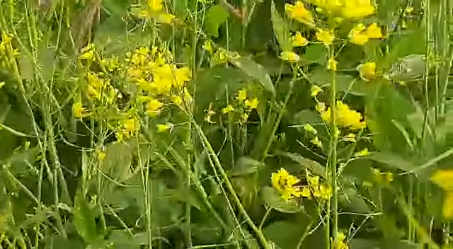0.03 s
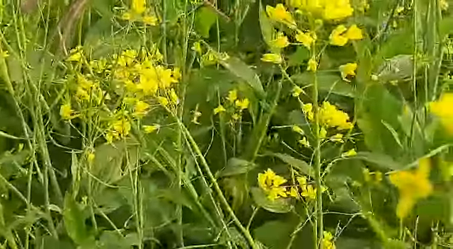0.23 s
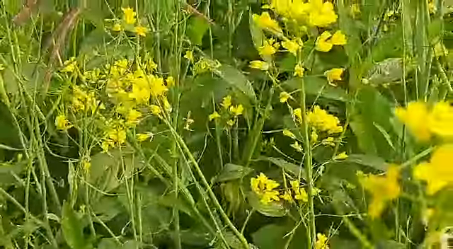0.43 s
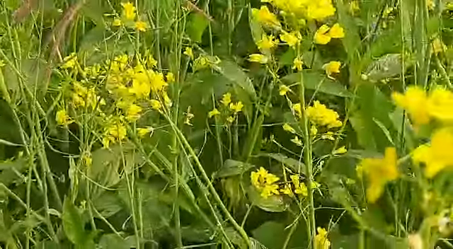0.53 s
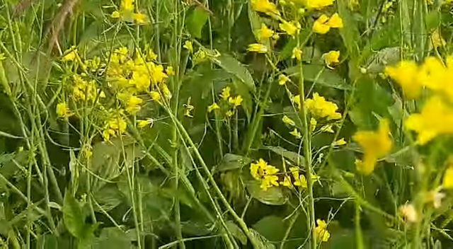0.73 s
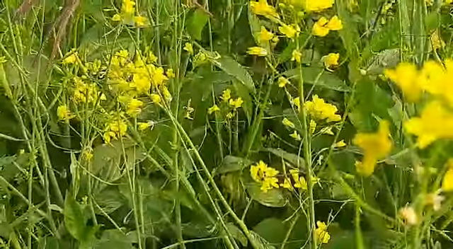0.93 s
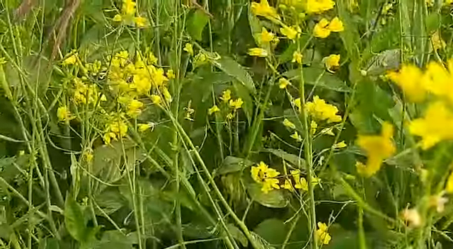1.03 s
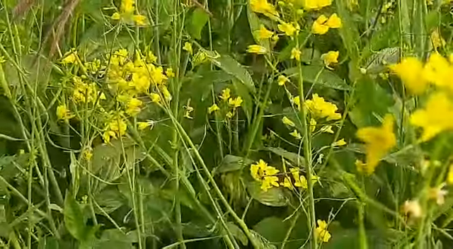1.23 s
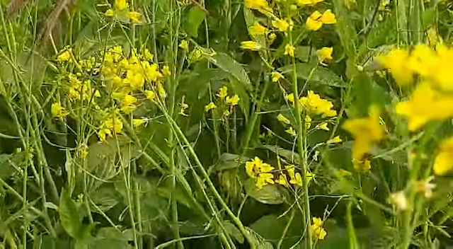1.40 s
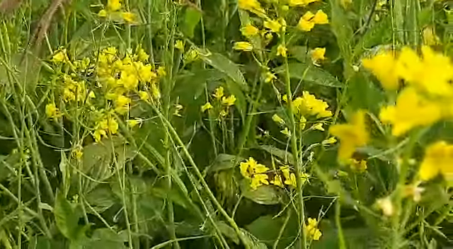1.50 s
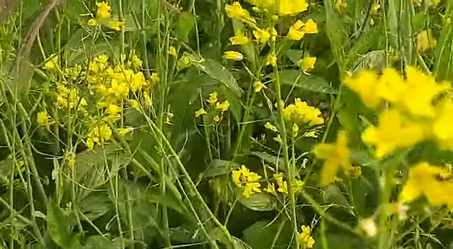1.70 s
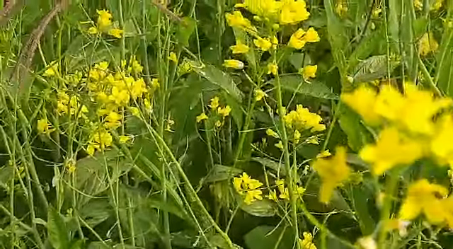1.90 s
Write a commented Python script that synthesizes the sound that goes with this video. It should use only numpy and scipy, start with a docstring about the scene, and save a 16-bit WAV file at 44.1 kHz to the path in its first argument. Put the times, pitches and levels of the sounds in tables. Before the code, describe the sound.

One short, bright call from a nearby small bird stands out over low wind rumble, light leaf rustle and a thin steady hiss in an open field. Afterwards come faint chips and hoarse calls from distant birds.

```python
"""An open field. Low air rumble, a rush and rustling leaves swell and sink under a steady high hiss.
Faint low tones and thin bird chips carry from far off. A small bird nearby calls once: quick,
mostly falling chips, then one whistle rolled into a trill that slows. A distant hoarse bird
calls through two throat resonances. Ground and plants reflect and scatter the calls."""
import sys
import numpy as np
from scipy import signal
from scipy.fft import rfft, irfft
from scipy.io import wavfile
from scipy.ndimage import uniform_filter1d, map_coordinates

SR = 44100
rng = np.random.default_rng(int(sys.argv[2]) if len(sys.argv) > 2 else 0)


def generate_wav(signal):
    """Clip the signal to [-1, 1] and save it as 16-bit WAV at the path in sys.argv[1]."""
    frames = np.transpose(np.atleast_2d(signal))
    scaled = np.clip(frames, -1, 1) * 32767
    pcm = np.round(scaled).astype(np.int16)
    wavfile.write(sys.argv[1], SR, pcm)


N = 85995
T = np.arange(N) / SR


def undb(db):
    """Decibels to gain."""
    return 10 ** (np.asarray(db) / 20)


def unit_rms(x):
    """Scale to rms 1."""
    return x / np.sqrt(np.mean(x ** 2))


def pan(left_lead_db):
    """Left and right gains."""
    return undb(np.array([[left_lead_db], [-left_lead_db]]) / 2)


def wander(rate_hz):
    """Smooth random curve, rms 1."""
    knots = rng.standard_normal(int(2 * rate_hz) + 4)
    return unit_rms(map_coordinates(knots, [T * rate_hz], mode="mirror"))


def noise(spectrum):
    """Noise shaped by (f/Hz, density/dB) points, rms 1."""
    hz, db = np.array(spectrum, float).T
    bins_hz = np.maximum(np.fft.rfftfreq(N, 1 / SR), 1)
    gain = undb(np.interp(np.log(bins_hz), np.log(hz), db))
    return unit_rms(irfft(rfft(rng.standard_normal(N)) * gain, N))


def stereo_noise(spectrum, side_db):
    """Mid noise plus opposed side noise."""
    return noise(spectrum) + undb(side_db) * noise(spectrum) * np.array([[1], [-1]])


def delay(x, delay_s):
    """Fractional delay."""
    return map_coordinates(x, [np.arange(N) - delay_s * SR])


def scatter(x, t60_s=0.33):
    """Diffuse tail from vegetation, independent at each ear."""
    tail = rng.standard_normal((2, N)) * undb(-60 * T / t60_s)
    tail /= np.sqrt(np.sum(tail[0] ** 2))
    return signal.fftconvolve(x[None], tail, axes=1)[:, :N]


def phase_of(hz):
    """Pitch curve to phase in radians."""
    return 2 * np.pi * np.cumsum(hz) / SR


def glide(start_s, length_s, from_hz, to_hz):
    """Arched envelope and linear pitch of one note."""
    progress = np.clip((T - start_s) / length_s, 0, 1)
    envelope = np.sqrt(np.abs(np.sin(np.pi * progress))) * (progress < 1)
    return envelope, from_hz + (to_hz - from_hz) * progress


def notes(rows, octave_db, jitter, third_db=-24):
    """Gliding notes: unsteady pitch, three harmonics."""
    out = 0
    for start_s, length_s, from_hz, to_hz, db in rows:
        envelope, hz = glide(start_s, length_s, from_hz, to_hz)
        phase = phase_of(hz * (1 + jitter * wander(900)))
        tone = np.sin(phase) + undb(octave_db) * np.sin(2 * phase) + undb(third_db) * np.sin(3 * phase)
        out = out + undb(db) * envelope * tone
    return out


# Air swell: t/s, relative rumble level/dB, relative rush and leaf level/dB
AIR_SWELL = [(0.0, -54, -53), (0.042, -50, -63.5), (0.21, -51.5, -61.5), (0.586, -42.5, -53),
             (0.634, -35.5, -49.5), (0.65, -38.5, -50), (0.77, -42.5, -53.5), (0.89, -43, -52.5),
             (0.922, -33.5, -52.5), (0.96, -47, -56.5), (1.2, -50, -58.5), (1.216, -43.5, -56.5),
             (1.472, -55.5, -62.5), (1.51, -53.5, -63), (1.916, -52.5, -60.5), (1.95, -54, -61)]
# Rumble, rush and leaf spectra: f/Hz, relative density/dB
RUMBLE_SPECTRUM = [(20, -39), (32, -24.5), (50, -4), (65, 1.5), (88, 1), (125, -3.5), (160, -14.5),
                   (220, -22.5), (400, -59), (1500, -97)]
RUSH_SPECTRUM = [(100, -9), (190, 0), (290, 2), (400, -7.5), (500, -5), (600, -1.5), (740, -4.5),
                 (950, -13.5), (1300, -22), (4000, -78)]
LEAF_SPECTRUM = [(600, -9.5), (1000, 0), (1250, -8), (1700, -1.5), (2300, -9.5), (3300, -11.5),
                 (5000, -18.5), (9000, -27.5), (15500, -29)]


def breeze(right_lag_s=0.00027):
    """Air rumbles and rushes, reaching the left ear first; leaves stir with the rush."""
    times_s, rumble_db, rush_db = np.array(AIR_SWELL).T
    rumble = stereo_noise(RUMBLE_SPECTRUM, side_db=-26.5)
    rumble /= np.sqrt(uniform_filter1d(rumble[0] ** 2, size=1800))  # flatten the envelope
    rumble *= undb(0.5 + np.interp(T, times_s, rumble_db)) * pan(0.8)
    swell = undb(np.interp(T, times_s, rush_db))
    rush = stereo_noise(RUSH_SPECTRUM, side_db=-13) * undb(0.5) * swell
    leaves = stereo_noise(LEAF_SPECTRUM, side_db=1.5) * undb(-11 + 1.2 * wander(14.37)) * swell
    left, right = rumble + rush
    return np.array([left, delay(right, right_lag_s)]) + leaves


# High hiss: f/Hz, relative density/dB
HISS_SPECTRUM = [(1000, -27), (2500, -22.5), (3300, -14.5), (4200, -13), (5300, -9.5), (6300, 0),
                 (6900, -1.5), (7600, 6), (8200, 2), (9000, -18), (11000, -19), (15500, -18)]


def hiss():
    """Near-steady noise, strongest at 6-8 kHz."""
    return stereo_noise(HISS_SPECTRUM, side_db=0) * undb(-65 + 0.38 * wander(5.72))


# Distant low tones: t/s, length/s, start f/Hz, end f/Hz, level/dB
LOW_TONES = [(0, 0.13, 298, 284, -58.5), (.44, 0.12, 660, 703, -57), (1.45, 0.503, 731.4, 717, -66),
             (1.55, 0.42, 587, 598, -70.5)]


def far_tones():
    """Faint wavering tones, scattered across the field."""
    tones = notes(LOW_TONES, octave_db=-29, jitter=0.019)
    return tones + scatter(tones)


# Distant chips: t/s, length/s, start f/Hz, end f/Hz, level/dB
THIN_CHIPS = [(.14, 0.048, 3830, 3670, -68.5), (.475, 0.058, 3530, 3450, -70.5),
              (1.09, 0.12, 4090, 3900, -77), (1.38, 0.058, 4480, 5070, -70.5),
              (1.505, 0.016, 4180, 4860, -71), (1.522, 0.011, 4980, 4300, -67),
              (1.54, 0.0166, 2810, 2690, -69), (1.705, 0.019, 4290, 3660, -69),
              (1.73, .06, 3370, 3184, -71.5)]


def far_chips():
    """Thin chips of distant birds, more scatter than direct sound."""
    chips = notes(THIN_CHIPS, octave_db=-34, jitter=0.048)
    return chips + undb(3.5) * scatter(chips)


# Near bird's chips: t/s, length/s, start f/Hz, end f/Hz, level/dB
OPENING_CHIPS = [(.698, 0.01, 4200, 4420, -54), (.7095, 0.012, 5100, 3760, -44),
                 (.7255, 0.0073, 5220, 4000, -42), (.732, 0.016, 4160, 3880, -50)]


def opening_chips():
    """Quick chips with a strong octave. Returns voice and rasp envelope."""
    chips = notes(OPENING_CHIPS, octave_db=-8, jitter=0.0327)
    return chips, 5 * uniform_filter1d(np.abs(chips), size=100)


# Pitch tops of the rolls: t/s, f/Hz, level/dB
ROLL_TOPS = [(0.7413, 3010, -35.5), (0.7632, 3034, -31.5), (.7850, 3073, -31), (0.8096, 3038, -29),
             (.8330, 3023, -29), (0.8582, 3036, -29), (0.8843, 3022, -31), (0.912, 3022, -29.5),
             (0.9378, 3010, -36)]
# One roll, top to top: phase/deg, pitch offset/Hz, level offset/dB
ROLL_CYCLE = [(0, -29, -10.5), (29, -100, -3), (60.2, -160, 2), (97.2, -250, -5.5), (127.7, -560, -19),
              (182, -760, -14.5), (256.9, -440, -26), (294, -260, -4.5), (315, -140, -1)]


def trill(start_s=0.744, end_s=0.950, fade_s=0.003, jitter=0.007, octave_db=-25.5):
    """Arching whistle, each roll a double beat and a reedy dip. Returns voice and rasp envelope."""
    tops_s, top_hz, top_db = np.array(ROLL_TOPS).T
    cycle_deg, offset_hz, offset_db = np.array(ROLL_CYCLE).T
    bounds_s = np.append(tops_s, 2 * tops_s[-1] - tops_s[-2])
    roll_rad = 2 * np.pi * np.interp(T, bounds_s, np.arange(len(bounds_s)))

    def each_roll(values):
        curve = np.interp(roll_rad, np.radians(cycle_deg), values, period=2 * np.pi)
        return uniform_filter1d(curve, size=50)

    gate = np.clip(np.minimum(T - start_s, end_s - T) / fade_s, 0, 1)
    effort = undb(np.interp(T, tops_s, top_db)) * gate
    hz = np.interp(T, tops_s, top_hz) + each_roll(offset_hz)
    phase = phase_of(hz * (1 + jitter * wander(900)))
    fundamental = undb(each_roll(offset_db)) * np.sin(phase)
    octave = undb(octave_db) * np.sin(roll_rad / 2) ** 2 * np.sin(2 * phase)  # peaks in the dips
    return effort * (fundamental + octave), effort * (1 + 0.13 * np.cos(roll_rad))


# Ground and plant reflections: delay/s, left gain, right gain
EARLY_REFLECTIONS = [(.0031, 0.059, 0.085), (.0056, 0.056, 0.12), (0.0134, .06, .08)]


def near_bird(left_lag_s=0.00005):
    """Chips and trill with rasp, close reflections and a faint tail."""
    whistle, trill_effort = trill()
    chips, chip_effort = opening_chips()
    voice = chips + whistle
    direct = np.array([delay(voice, left_lag_s), voice])
    early = sum(delay(voice, delay_s) * np.array([[left], [right]])
                for delay_s, left, right in EARLY_REFLECTIONS)
    breath = rasp(chip_effort + trill_effort)
    return (direct + early) * pan(2) + undb(-17) * scatter(voice) + breath


# Near bird's rasp: f/Hz, relative density/dB
RASP_SPECTRUM = [(1500, 2), (2300, 10), (2900, 9), (3300, -19), (3700, -8), (4200, 2), (5000, 0),
                 (5700, -1.5), (8000, 4.5), (10000, -9), (15500, -9.5)]


def rasp(effort):
    """Broadband noise that follows the bird's effort."""
    return undb(-26.5) * effort * stereo_noise(RASP_SPECTRUM, side_db=1.5)


# Hoarse calls: t/s, length/s, start f/Hz, end f/Hz, level/dB, relative upper resonance level/dB
HOARSE_CALLS = [(0.915, 0.1, 1427, 1385, -68, -15), (1.013, 0.072, 1656, 1690, -68.5, -31),
                (1.31, 0.13, 1625, 1583, -70, -2), (1.584, 0.16, 1661, 1657, -56, -22),
                (1.68, .12, 1807, 1418, -60.5, -10), (1.81, 0.14, 1595, 1553, -70.5, -2.5)]


def hoarse_bird(pulse_hz=95.06, wobble_hz=74.5, upper_hz=2170):
    """Throbbing calls in two unsteady throat resonances, blurred by distance."""
    calls = 0
    for start_s, length_s, from_hz, to_hz, db, upper_db in HOARSE_CALLS:
        envelope, hz = glide(start_s, length_s, from_hz, to_hz)
        pulse = np.sin(phase_of(pulse_hz * (1 + 0.148 * wander(60))))
        throb = 1 + 0.19 * pulse + 0.395 * wander(400)
        lower = np.sin(phase_of(hz + wobble_hz * wander(220)) + 0.34 * wander(700))
        upper = undb(upper_db) * np.sin(phase_of(upper_hz + 70 * wander(200)))
        calls = calls + undb(db) * envelope ** 2 * throb * (lower + upper)
    return (calls + undb(5.5) * scatter(calls)) * pan(3.5)


def scene():
    """Birds and far tones over moving air, in stereo."""
    return near_bird() + hoarse_bird() + far_chips() + far_tones() + breeze() + hiss()


def record(dry, cutoff_hz=15700):
    """Steep elliptic low-pass."""
    return signal.sosfilt(signal.ellip(10, 0.2, 70, cutoff_hz, fs=SR, output="sos"), dry)


dry = scene()
out = record(dry)
generate_wav(out)
```